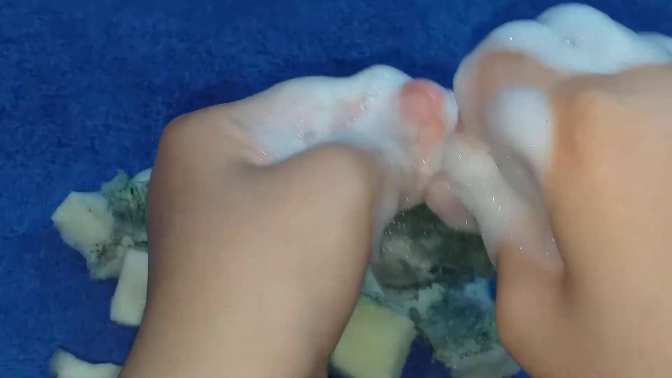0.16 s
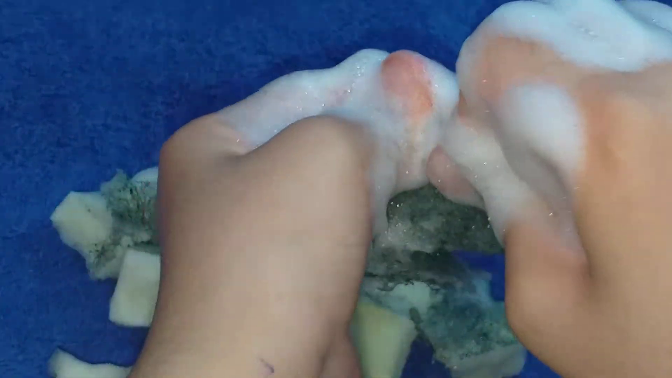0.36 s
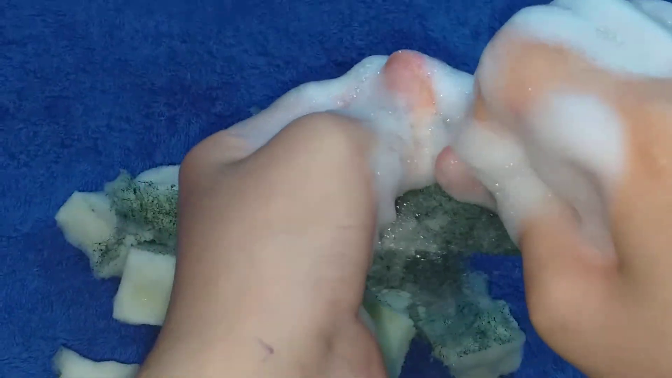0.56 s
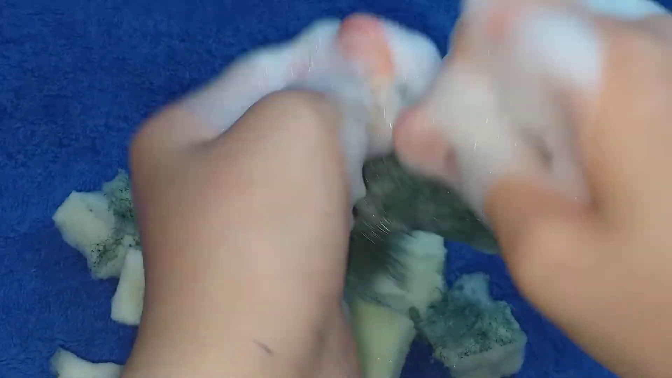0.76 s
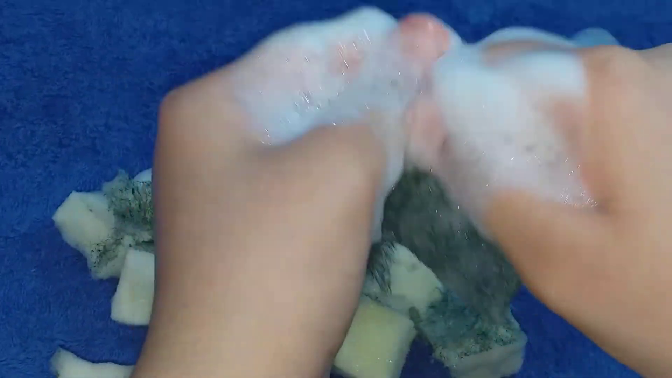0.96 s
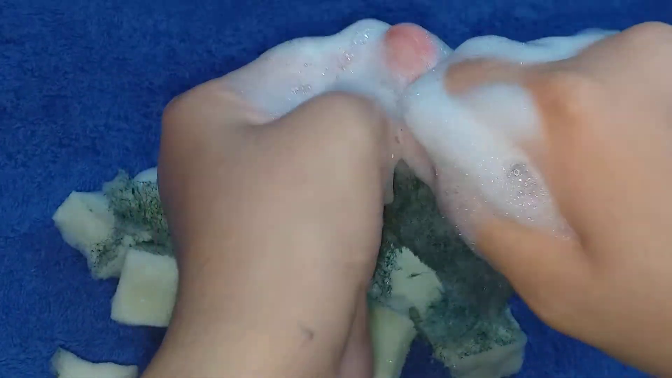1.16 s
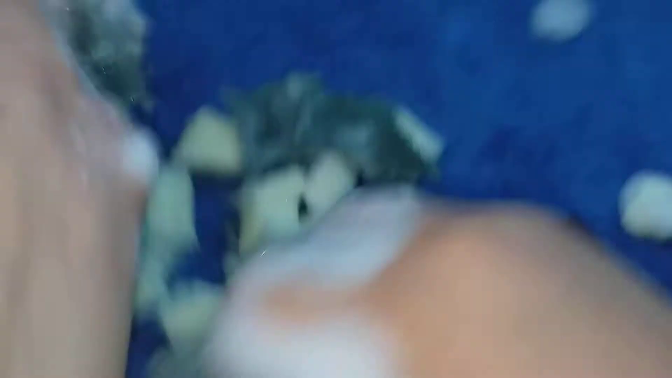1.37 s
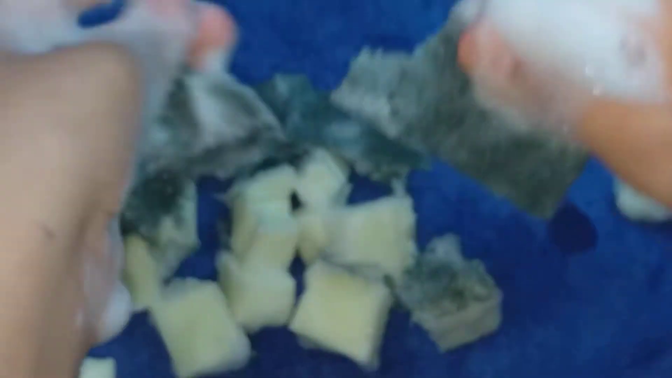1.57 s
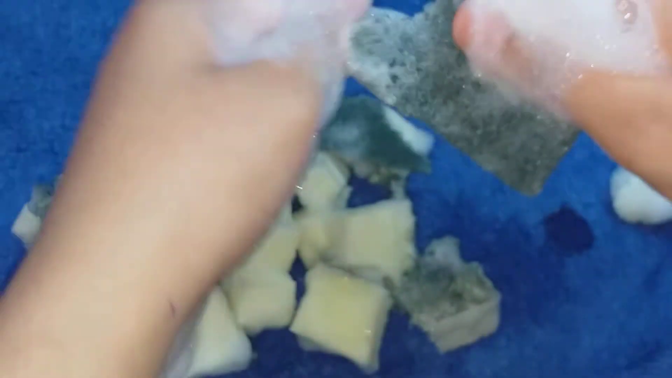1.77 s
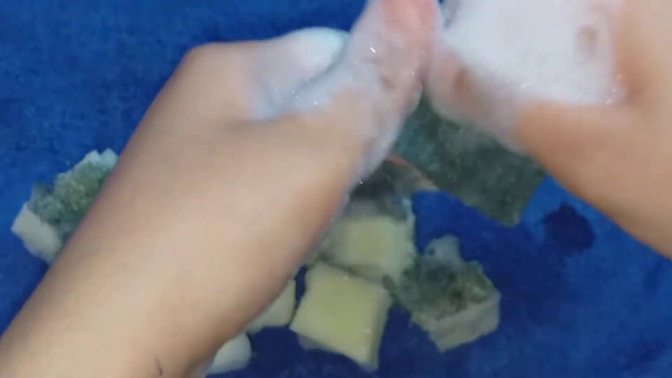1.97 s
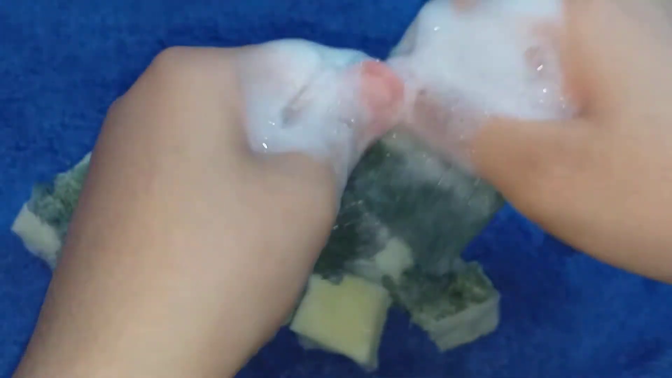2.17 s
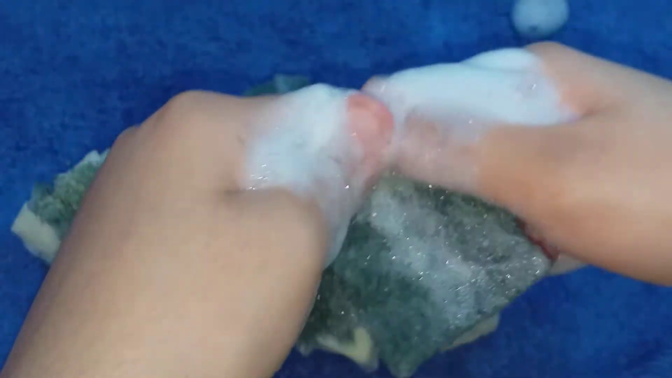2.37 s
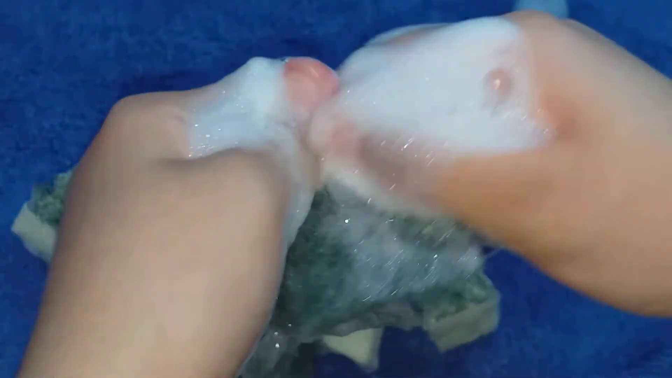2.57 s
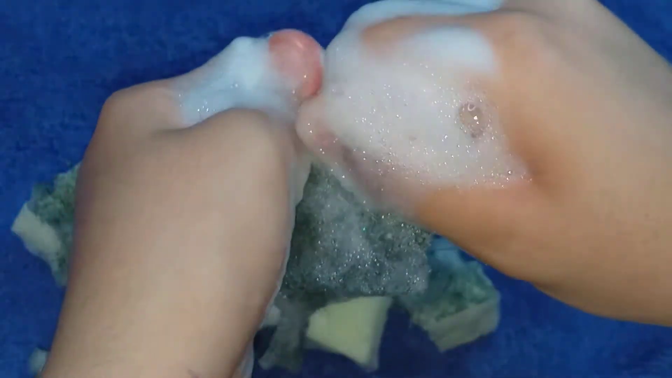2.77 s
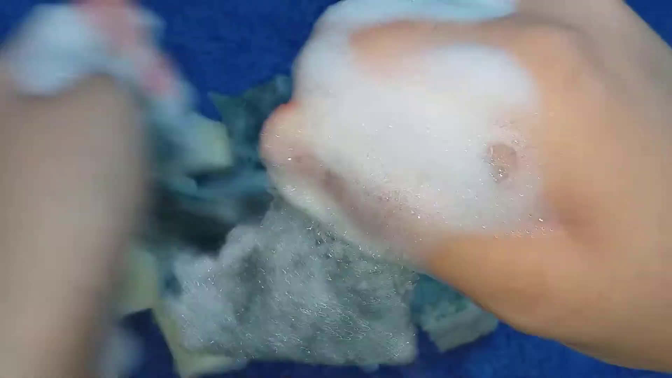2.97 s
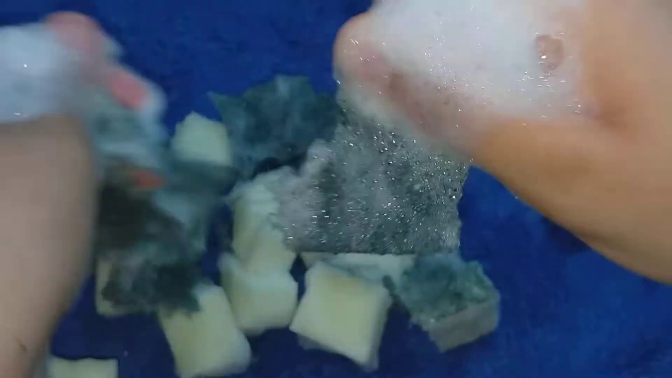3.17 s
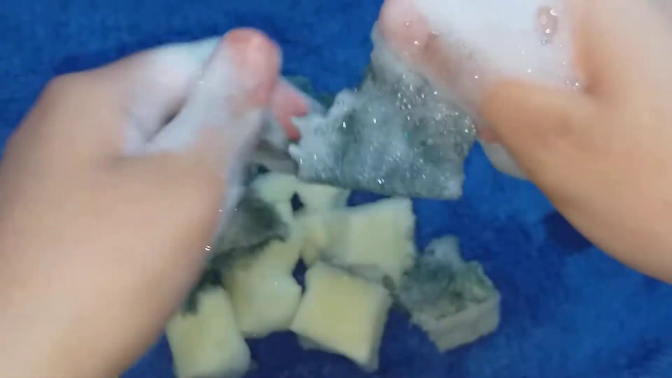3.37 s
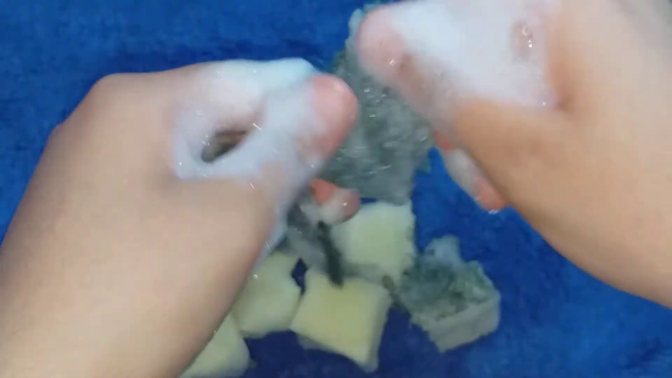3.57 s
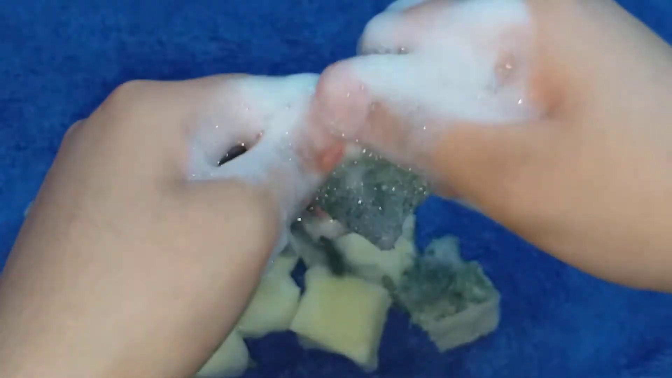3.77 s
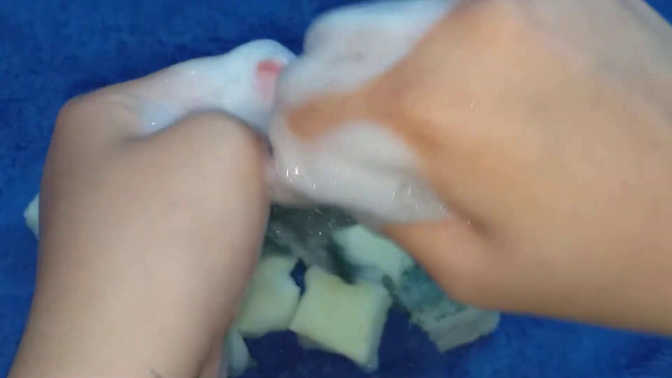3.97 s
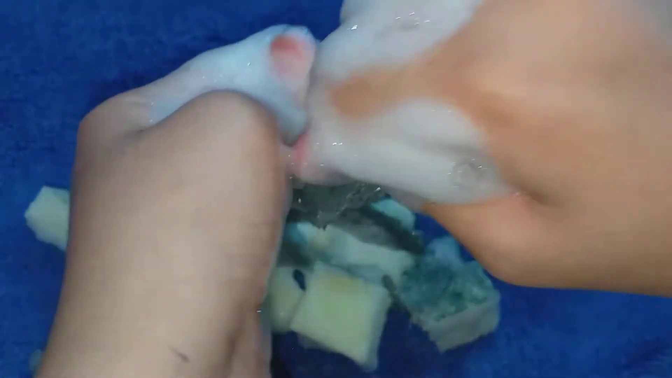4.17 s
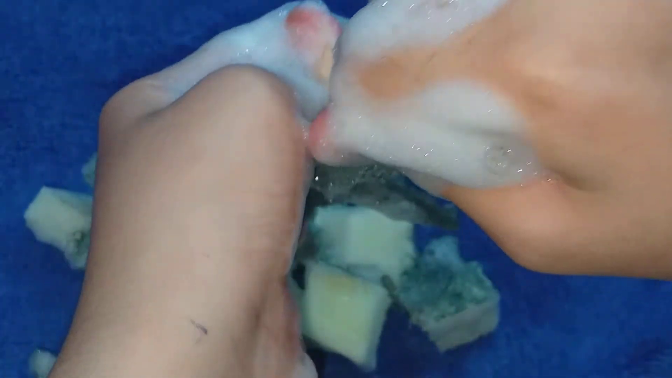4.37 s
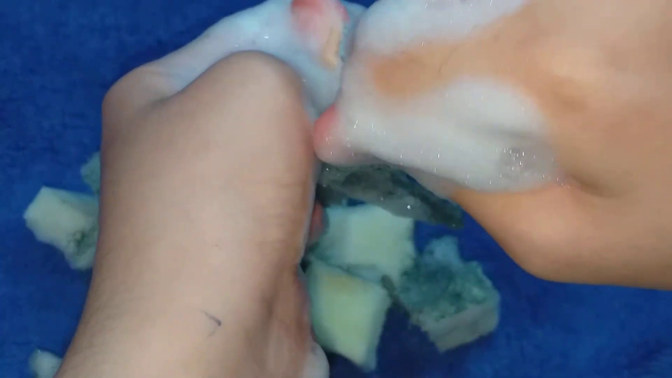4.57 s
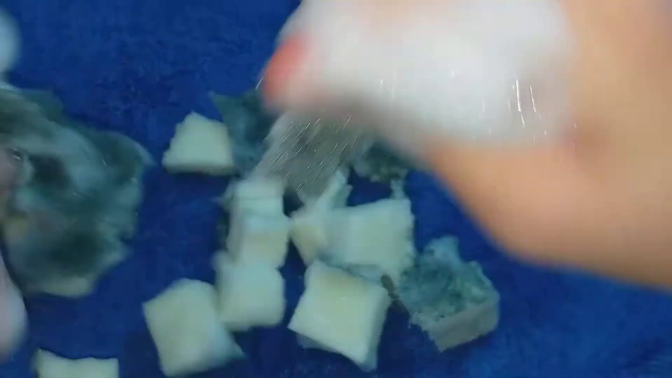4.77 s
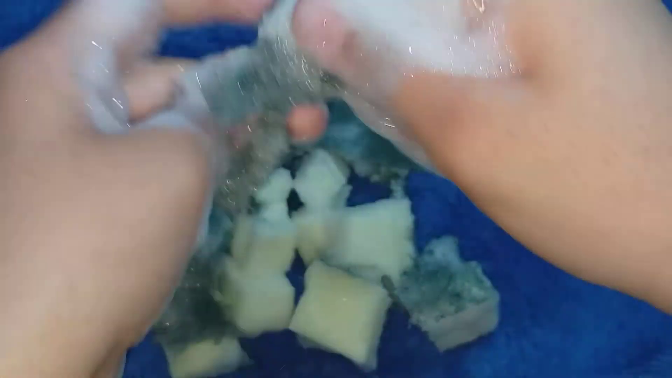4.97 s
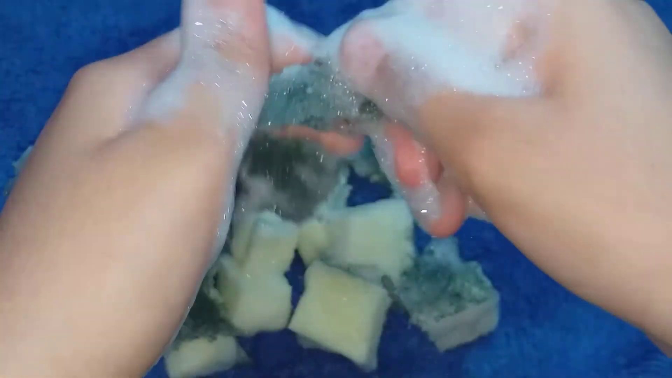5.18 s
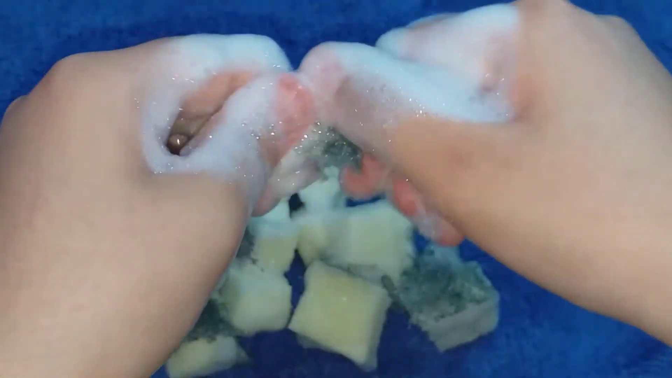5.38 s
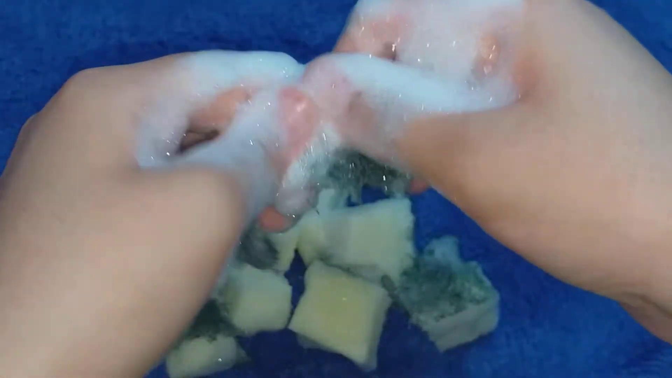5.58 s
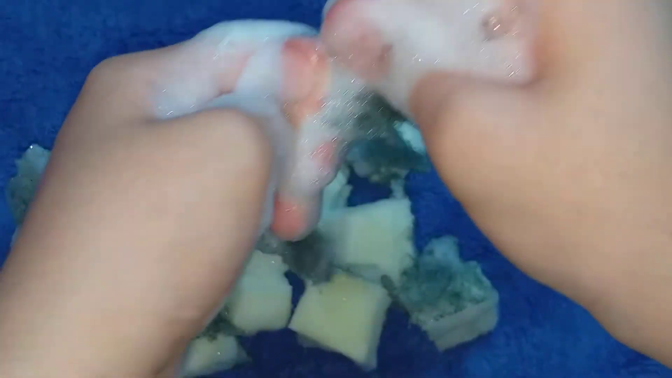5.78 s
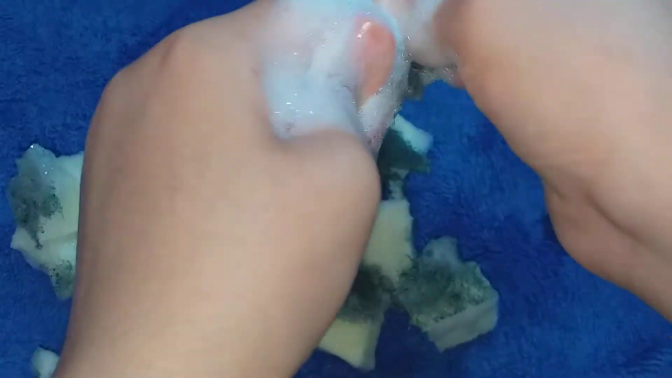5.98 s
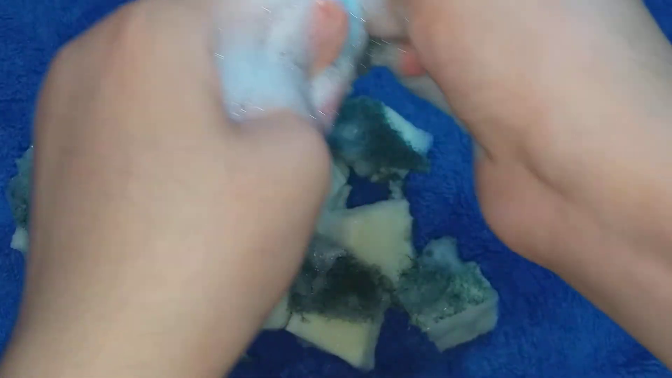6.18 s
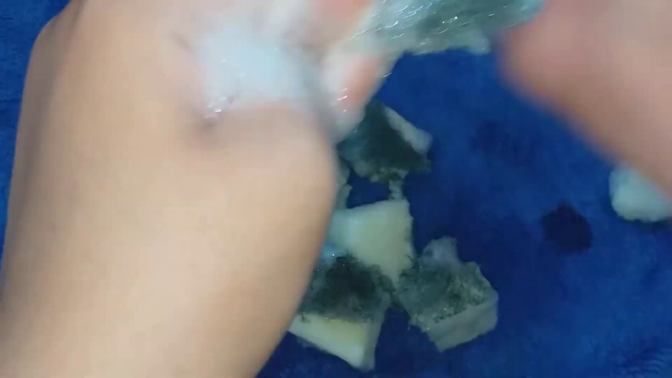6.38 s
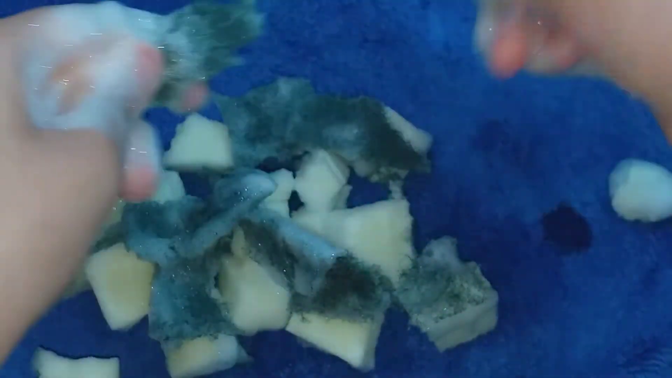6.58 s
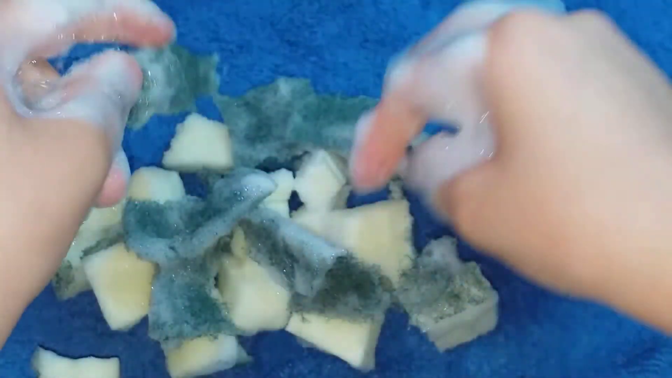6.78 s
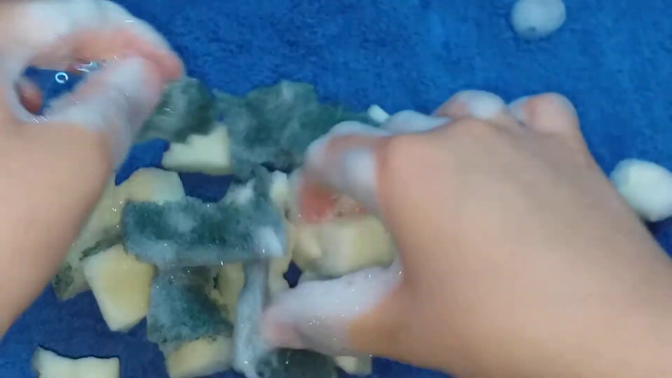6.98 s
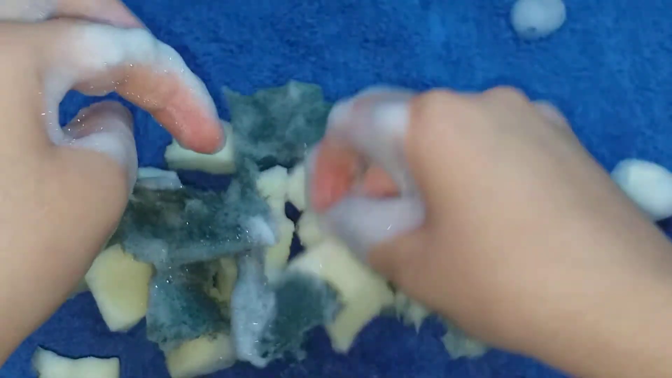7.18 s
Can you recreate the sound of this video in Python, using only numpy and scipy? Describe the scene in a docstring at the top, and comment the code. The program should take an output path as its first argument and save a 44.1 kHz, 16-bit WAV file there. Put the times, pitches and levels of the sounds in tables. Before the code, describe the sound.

Very close to a phone microphone in a small room, soapy hands tug a fibrous scouring pad. Isolated snaps lead to a short rip, then flung suds tick and patter on the phone's case. Three more bouts of crackling follow, each ending in an abrupt rip, with faint foamy squishes between. A thin electronic buzz, soft hiss and distant low rumble continue underneath.

```python
"""A scouring pad is torn by soapy hands close to a phone: fibres snap one by one, then the pad rips through.
Random noise bursts, coloured by fibre resonances, make the tear; shaped noise adds squishes and low puffs.
After the first rip flung suds patter on the phone's case, as impulses ringing its damped modes.
A small room answers with decaying noise; a far machine rumbles as filtered noise beside a faint hum,
and the phone's electronics leak a thin buzz of paired spikes and a noise hiss."""
import sys
import numpy as np
from scipy import signal
from scipy.fft import rfft, irfft, next_fast_len
from scipy.io import wavfile
from scipy.ndimage import uniform_filter1d, map_coordinates

SR = 44100
rng = np.random.default_rng(int(sys.argv[2]) if len(sys.argv) > 2 else 0)


def wav_out(sig):
    """Save sig, one row per channel (or a flat mono array), as 16-bit PCM at SR to the path in sys.argv[1]."""
    wavfile.write(sys.argv[1], SR, np.round(np.clip(np.atleast_2d(sig).T, -1, 1) * 32767).astype(np.int16))


def nominal_scale(level):
    """Amplitude ratio for a level in decibels (scalar or array-like)."""
    x = np.asarray(level, float) / 20
    return 10 ** x


N = 318843  # samples


def unit(x):
    """Normalisation: equal power, rms 1."""
    return x / np.sqrt(np.mean(x ** 2) + 1e-20)


def along(points, hz):
    """Interpolation on a logarithmic frequency axis: (frequency [Hz], value) points read at hz."""
    f, v = np.transpose(points)
    return np.interp(np.log(hz + 1), np.log(f + 1), v)


def wobble(rate):
    """Slow random modulation: a smooth curve through random knots, rate knots a second."""
    knots = rng.standard_normal(int(N * rate / SR) + 4)
    return map_coordinates(knots, [np.arange(N) * rate / SR])


def filtered(x, response):
    """Linear filtering: the spectrum of x times a complex response of frequency."""
    m = next_fast_len(N + 8192)
    return irfft(rfft(x, m) * response(np.fft.rfftfreq(m, 1 / SR)), m)[:N]


def coloured(x, spectrum):
    """Spectral shaping by (frequency [Hz], level [dB]) points; white noise keeps its power."""
    return filtered(x, lambda hz: unit(nominal_scale(along(spectrum, hz))))


def spikes(seconds, sizes):
    """Band-limited impulses: windowed sinc pulses at exact times between samples."""
    at = np.asarray(seconds)[:, None] * SR
    k = np.floor(at).astype(int) + np.arange(-7, 9)
    window = np.cos(np.pi * (k - at) / 16) ** 2
    shape = np.asarray(sizes)[:, None] * np.sinc(k - at) * window
    ok = (k >= 0) & (k < N)
    return np.bincount(k[ok], shape[ok], N)


def bursts(strikes, life_s):
    """Exponential decay: each strike sets off noise that falls to 1/e in life_s."""
    envelope = signal.lfilter([1], [1, -np.exp(-1 / (life_s * SR))], strikes)
    return envelope * rng.standard_normal(N)


# the clearest single fibre snaps: (time [s], drive level [dB])
FIBRE_SNAPS = [(0.1998, -34.5), (0.3534, -32.5), (0.3679, -36), (0.4112, -39), (0.4534, -37.5), (0.59, -34),
               (1.276, -35), (1.2892, -37), (1.309, -29.5), (2.7187, -39), (2.751, -30), (2.758, -27),
               (2.774, -28.5), (2.7993, -30), (2.8217, -32), (2.843, -38), (2.8601, -34.5), (2.875, -38),
               (2.9125, -30), (2.9185, -29), (4.184, -38), (4.2318, -39.5), (4.2751, -37), (4.281, -28.5),
               (4.362, -42), (4.3902, -34.5), (4.415, -32.5), (4.484, -39), (4.4926, -33), (4.499, -29),
               (4.618, -36), (4.6322, -29.5), (5.3332, -42), (5.9004, -37), (5.9169, -36), (5.9471, -42.5),
               (5.9598, -41), (6.008, -42), (6.0306, -38), (6.0355, -34.5), (6.0429, -34), (6.05, -40),
               (6.0667, -34.5), (6.0911, -39), (6.1549, -37.5), (6.1613, -40.5), (6.236, -35),
               (6.2564, -37), (6.27, -31.5), (6.304, -39), (6.3143, -36), (6.328, -27.5), (6.389, -38.5)]


def tear():
    """Random impulse process: fibres break faster as the tear gets harder, over a fine fizz; some snap alone."""
    level_db, share_db = effort_of_hands()
    base_rate = 1600 * nominal_scale(np.clip(0.81 * (level_db + 49.0), -5, 17))  # breaks a second before clumping
    clumping = np.clip(-.03 * (level_db + 24), .05, .7)  # slow tearing comes in clumps
    chance = base_rate / SR * np.exp(clumping * wobble(120))
    sizes = nominal_scale(3.4 * np.minimum(rng.exponential(size=N), 3.2))
    strikes = (rng.random(N) < chance) * sizes
    fizz = .25 * rng.standard_normal(N)
    grains = bursts(strikes, life_s=0.0003) + fizz
    power = uniform_filter1d(grains ** 2, size=700)  # the hands feed the tear evenly over 16 ms
    crackle = nominal_scale(level_db + 1.04) * grains / np.sqrt(np.abs(power))

    at, drive_db = np.transpose(FIBRE_SNAPS)
    blows = spikes(at, nominal_scale(drive_db))
    snaps = 0.95 * blows + 0.69 * bursts(blows, life_s=0.0004) + 0.12 * bursts(blows, life_s=.0025)

    # hard or dull tearing moves the foam too
    depth_db = np.clip(0.57 * (level_db + 40.0) - 1.5 * (share_db + 6.5), -12, 2.5)
    # gentle tugs break the thin fibres
    thin = np.clip(-.03 * (level_db + 26) + .7 * wobble(300), 0, 1)
    # treble leans against body by a random amount; a full rip averages many breaks
    lean_db = 2.5 * np.clip(-.06 * (level_db + 27.5), 0, 1) * wobble(250)
    crackling = fibre(crackle, lean_db, thin, share_db, depth_db)
    return crackling + fibre(snaps, lean_db / 2 - 1.0, thin, share_db, depth_db)


# short tugs on the pad:
# (peak time [s], swell [s], fall [s], crackle drive level [dB], treble share [dB])
PAD_TUGS = [(0.357, 0.0089, 0.021, -58, -2), (0.397, 0.0096, 0.033, -49.5, -1.5),
            (0.597, 0.019, .08, -53.5, -1), (0.636, 0.061, 0.073, -53.5, -2.5),
            (1.302, 0.015, .02, -46, -5), (2.721, 0.016, 0.031, -53, -11), (2.757, 0.055, 0.16, -51, -8.5),
            (2.822, 0.035, 0.021, -47, -8.5), (2.84, .02, 0.12, -59, -12), (4.016, 0.12, 0.029, -58.5, -8),
            (4.184, 0.091, 0.024, -56.5, -5), (4.288, 0.028, 0.072, -49, -5),
            (4.389, 0.043, 0.072, -51.5, -3.5), (4.497, 0.052, 0.053, -45.5, -5.5),
            (4.575, 0.027, 0.043, -58, -4), (4.64, 0.029, 0.11, -45.5, -3.5), (4.95, 0.34, 0.15, -64.5, -2),
            (5.87, 0.35, .05, -71, 5), (5.948, 0.11, 0.021, -57.5, -2.5), (6.04, 0.071, 0.086, -56, -5),
            (6.159, 0.2, 0.049, -61.5, -3.5), (6.272, 0.02, 0.037, -49, -2), (6.58, 0.27, 0.22, -61.5, -1),
            (7.13, .15, 0.29, -72.5, -16)]
# runs where the tear travels through the pad and stops dead:
# (start [s], length [s], first drive level [dB], last drive level [dB], treble share [dB])
TEAR_RUNS = [(1.309, .034, -36.5, -32, -9), (2.924, .046, -36.5, -33.5, -8), (2.963, 0.045, -33, -34, -2),
             (4.406, .075, -51.5, -50.5, -3.5), (4.652, 0.02, -43.5, -48, -5),
             (4.682, 0.0157, -33, -33, -3.5), (6.331, 0.014, -43.5, -43, -2),
             (6.353, 0.025, -41, -29.5, -2)]


def effort_of_hands():
    """Envelope by the maximum rule: the strongest tug or run sets crackle level and treble share."""
    swell_db = 20  # rise over a tug's swell and loss over its fall
    bite_db_per_s, stop_db_per_s = 1796.5, 3496  # how fast a run starts and stops
    t = np.arange(N) / SR
    shapes = []
    for s, swell, fall, db, share in PAD_TUGS:
        shapes.append((db - swell_db * np.maximum((s - t) / swell, (t - s) / fall), share))
    for s, length, first_db, last_db, share in TEAR_RUNS:
        plateau_db = np.interp(t, [s, s + length], [first_db, last_db])
        bite_db = bite_db_per_s * np.maximum(s - t, 0)
        stop_db = stop_db_per_s * np.maximum(t - s - length, 0)
        shapes.append((plateau_db - bite_db - stop_db, share))

    level_db, share_db = np.full(N, -90.), np.zeros(N)
    for db, share in shapes:
        share_db = np.where(db > level_db, share, share_db)
        level_db = np.maximum(db, level_db)
    return level_db, uniform_filter1d(share_db, size=400)


# body of a breaking fibre at mean pitch: (frequency [Hz], relative spectral density [dB])
BODY_SPECTRUM = [(70, -17), (160, -10), (565, -20), (800, -14), (1530, 0.5), (2600, -4), (3600, 3.5),
                 (5600, -1.5), (6500, -19), (8580, -27), (14500, -120)]
# treble edge of a breaking fibre: (frequency [Hz], relative spectral density [dB])
EDGE_SPECTRUM = [(4060, -39), (6900, -13), (8310, -1.5), (10400, -1.5), (13200, -15.5), (16000, -31.5)]


def fibre(burst, tilt_db, thin, share_db, depth_db):
    """Resonance scaling: deep, body and edge bands share a break's power, and thin fibres ring higher."""
    thin_pitch = 1.052  # ratio to the mean body pitch; thick fibres take the inverse
    edge = np.clip(nominal_scale(share_db), 0, .98)
    out = coloured(burst * edge * nominal_scale(tilt_db), EDGE_SPECTRUM)
    for part, pitch in (thin, thin_pitch), (1 - thin, 1 / thin_pitch):
        body = burst * part * np.sqrt(1 - edge ** 2) * nominal_scale(-tilt_db)
        deep = filtered(body, lambda hz: 1 / (1 + (hz / 2900) ** 8))
        spectrum = [(hz * pitch, db) for hz, db in BODY_SPECTRUM]
        out = out + coloured(body + deep * (nominal_scale(depth_db) - 1), spectrum)
    return out


# wet fingers squeeze the foam: (middle [s], length between 1/e points [s], mean level at the middle [dB])
FOAM_SQUEEZES = [(0.673, 0.11, -71.5), (0.92, 0.17, -71), (3.263, 0.12, -77.5), (5.382, 0.018, -72.5),
                 (7.12, 0.07, -73)]


def log_bell(hz, centre_hz, spread):
    """Gaussian passband in the natural logarithm of frequency."""
    return np.exp(-(np.log(hz / centre_hz + 1e-9) / spread) ** 2)


def squish():
    """Flow noise: air hisses softly through wide and narrow wet pores, swelling and fading."""
    t = np.arange(N) / SR
    swell = sum(nominal_scale(db) * np.exp(-(2 * (t - s) / length) ** 2) for s, length, db in FOAM_SQUEEZES)
    pores = filtered(rng.standard_normal(N),
                     lambda hz: log_bell(hz, 1610, 0.29) + nominal_scale(-1.5) * log_bell(hz, 3750, 0.17))
    return swell * nominal_scale(5.4 * wobble(40)) * unit(pores)


# the halves of the pad spring apart at the end of a rip: (time [s], level [dB])
PAD_PARTINGS = [(1.342, -60), (3.007, -48.5), (4.694, -72), (6.38, -53)]


def parting():
    """Release of stored strain: a low puff of band noise as the stretched foam lets go."""
    half_length_s = .012  # from the peak to 1/e
    t = np.arange(N) / SR
    swell = sum(nominal_scale(db) * np.exp(-((t - s) / half_length_s) ** 2) for s, db in PAD_PARTINGS)
    low = filtered(rng.standard_normal(N), lambda hz: log_bell(hz, 404, 1))
    return swell * unit(low)


# blobs of suds landing on the case, drive level of each mode:
# (time [s], tick [dB], thud [dB], hollow [dB], bright [dB])
SUDS_BLOBS = [(1.3956, -21.5, -40, -37, -34.5), (1.4025, -22, -34.5, -34, -22),
              (1.4047, -27.5, -43.5, -35, -21.5), (1.408, -6.5, -32.5, -14, -17.5),
              (1.413, -20, -28.5, -19, -24.5), (1.4213, -45, -39.5, -38, -48.5),
              (1.4353, -33, -36.5, -35, -45.5), (1.5642, -34.5, -48, -43.5, -30.5),
              (1.6231, -26, -49, -29, -29), (1.6999, -41.5, -59, -48.5, -40),
              (1.7566, -19.5, -36, -28.5, -34), (1.7661, -30.5, -39, -31.5, -55),
              (1.8248, -12.5, -24.5, -18, -24), (1.8302, -8, -36.5, -63, -18.5),
              (1.9503, -39, -38, -33.5, -37), (1.9523, -24.5, -52, -54, -30),
              (2.0311, -32, -48.5, -36, -35)]
# tick, thud, hollow and bright case modes under a wet splat: (frequency [Hz], width [Hz])
CASE_MODES = [(4380, 2700), (85, 210), (1354, 2230), (7350, 2300)]
# light drops that trail behind: (time [s], hollow drive level [dB], pitch of the free hollow ring [Hz])
LIGHT_DROPS = [(2.1722, -52.5, 970), (2.2389, -56.5, 1010), (2.249, -53, 1080), (2.2578, -52.5, 1030),
               (2.3453, -55, 970), (2.4385, -57.5, 970), (2.598, -54, 1067), (2.64, -63, 1030)]


def suds():
    """Modal excitation: each blob rings the case's modes; light drops leave the hollow one less damped."""
    free_width_hz = 360  # the less damped hollow mode
    s, *levels = np.transpose(SUDS_BLOBS)
    out = sum(knock(s, db, *mode) for db, mode in zip(levels, CASE_MODES))
    # each blow also sets off a faint, less damped hollow ring near 1 kHz
    out = out + knock(s, levels[2] - 20, 1020, free_width_hz)
    for at, db, hz in LIGHT_DROPS:
        out = out + knock(np.array([at]), np.array([db]), hz, free_width_hz)
    s, db, _ = np.transpose(LIGHT_DROPS)
    tick, thud, _, bright = CASE_MODES
    for over_db, mode in (5.5, tick), (-7.5, thud), (6, bright):  # over the hollow drive level
        out = out + knock(s, db + over_db, *mode)
    return filtered(out, lambda f: 1 / (1 + 1j * f / 11000) ** 4)  # a soft contact dulls the top


def knock(s, db, hz, width_hz):
    """Damped resonance: blows and a short spatter ring one mode; fine spatter barely moves low modes."""
    blow = spikes(s, nominal_scale(db + 11.5) * SR / (2 * np.pi * width_hz))
    spatter = blow + 0.17 * (hz / 4500) * bursts(blow, life_s=0.0016)
    # two equal resonators in cascade
    return filtered(spatter, lambda f: (1j * f * width_hz / (hz * hz - f * f + 1j * f * width_hz)) ** 2)


# reverberation of the small room: (frequency [Hz], time to decay by 60 dB [s])
ROOM_DECAY = [(300, 0.27), (2000, .3), (6000, 0.16), (14000, 0.1)]


def room(x):
    """Reverberation: convolution with noise in which each frequency dies at its own speed."""
    hz, t, z = signal.stft(rng.standard_normal(SR // 2), SR, nperseg=256)
    decay = nominal_scale(-60 * t / along(ROOM_DECAY, hz)[:, None])
    tail = signal.istft(z * decay, SR, nperseg=256)[1]
    delayed = np.pad(x, (150, 0))  # samples
    return signal.fftconvolve(delayed, tail / np.linalg.norm(tail))[:N]


def buzz():
    """Periodic switching: five scans in each screen refresh, each an on spike and an opposite off spike."""
    refresh_hz, scan_s, first_s = 59.849, .003276, -.004240  # refresh rate, scan step, first scan
    frames = np.arange(int(N / SR * refresh_hz) + 2) / refresh_hz
    on = (first_s + frames[:, None] + scan_s * np.arange(5)).ravel()
    edges = spikes(on, np.ones(len(on))) - spikes(on + .000148, np.full(len(on), .9))
    return nominal_scale(-53.0) * coloured(edges, [(800, -8.5), (2500, -1.0), (9000, 0.5), (15000, -3.0)])


# rumble of the far machine: (frequency [Hz], relative spectral density [dB])
RUMBLE_SPECTRUM = [(30, -21), (54, -3), (86, -10), (134, 3), (265, -20), (500, -33.5), (650, -58),
                   (1100, -120)]
# hiss of the microphone: (frequency [Hz], relative spectral density [dB])
HISS_SPECTRUM = [(300, -6.5), (1200, -9.5), (3800, -3.5), (6200, -8.5), (10000, 0.5), (13800, -12),
                 (15800, -11.5)]


def background():
    """Stationary noise, slowly modulated: a wavering rumble with a faint hum, and microphone hiss."""
    t = np.arange(N) / SR
    waver_db = 1.3 * wobble(2) + 1.3 * wobble(8)
    rumble = nominal_scale(-69.5 + waver_db) * coloured(rng.standard_normal(N), RUMBLE_SPECTRUM)
    hum = nominal_scale(-80.0 + 2.6 * wobble(4.4)) * np.sin(2 * np.pi * 251 * t + 0.36 * wobble(14))
    hiss = nominal_scale(-70.5 + 1.5 * wobble(1.8)) * coloured(rng.standard_normal(N), HISS_SPECTRUM)
    return rumble + hum + hiss


def scene():
    """Superposition: pad and suds near the phone, the room's answer, buzz and background."""
    pad = tear() + squish() + parting()
    blobs = suds()
    answer = room(nominal_scale(-15.0) * pad + nominal_scale(-39.5) * blobs)
    return (pad + blobs + answer + buzz() + background())[None]


def roll_off(x):
    """The treble ends steeply here."""
    return signal.sosfilt(signal.butter(12, 16480, fs=SR, output="sos"), x)


def record(dry):
    """Band limiting: the phone cuts the deepest bass and keeps nothing above its band limit."""
    kept = signal.sosfilt(signal.butter(4, 58, "high", fs=SR, output="sos"), dry[0])
    kept = filtered(kept, lambda hz: hz < 15850)
    return roll_off(kept[None])


dry = scene()
out = record(dry)
wav_out(out)
```